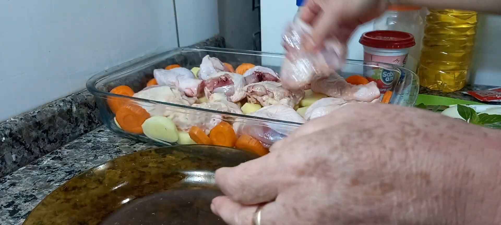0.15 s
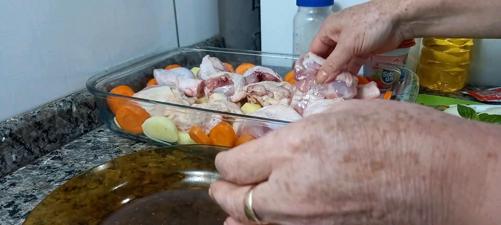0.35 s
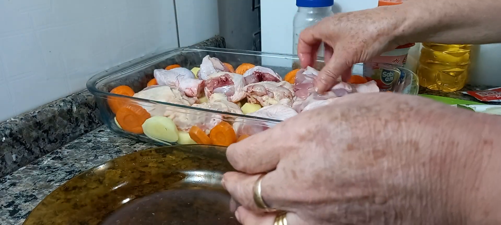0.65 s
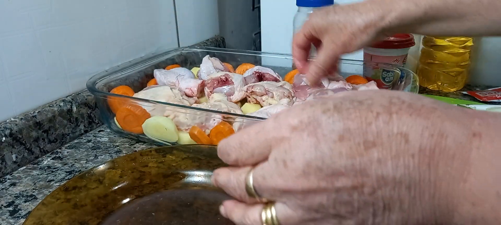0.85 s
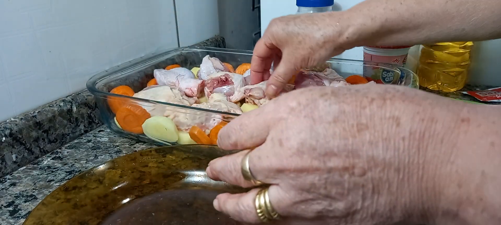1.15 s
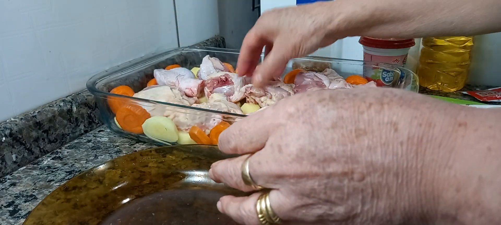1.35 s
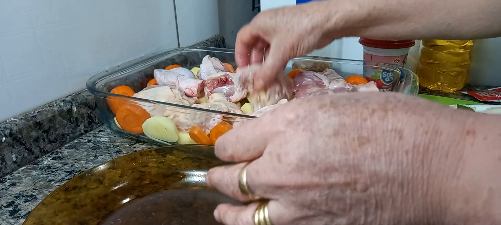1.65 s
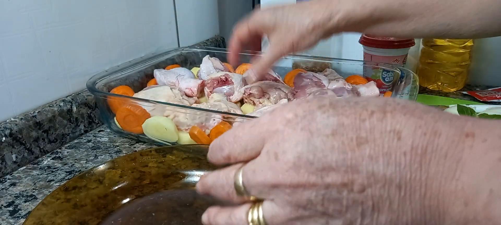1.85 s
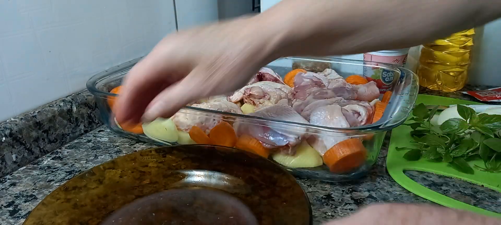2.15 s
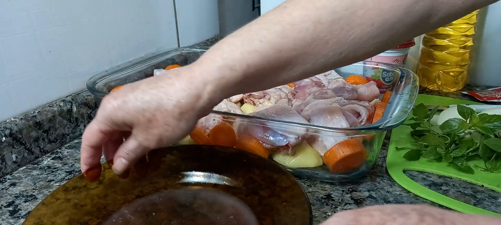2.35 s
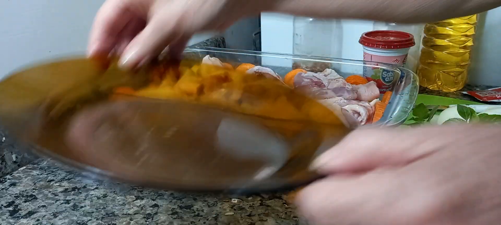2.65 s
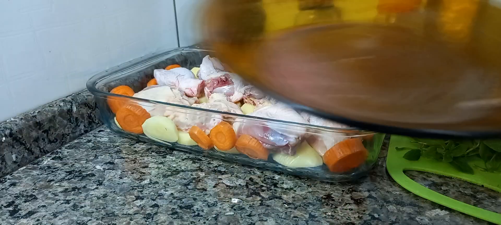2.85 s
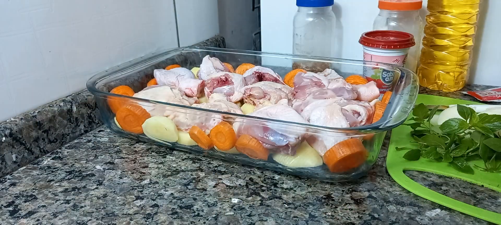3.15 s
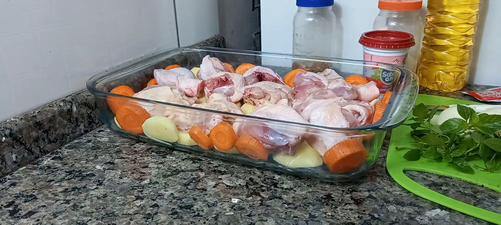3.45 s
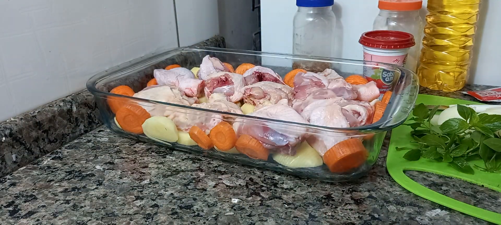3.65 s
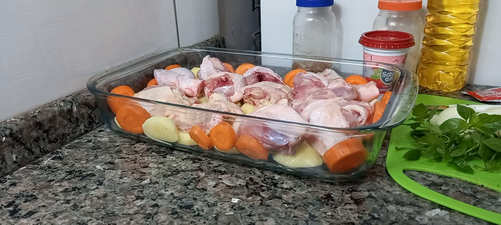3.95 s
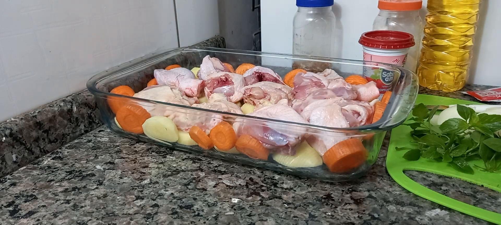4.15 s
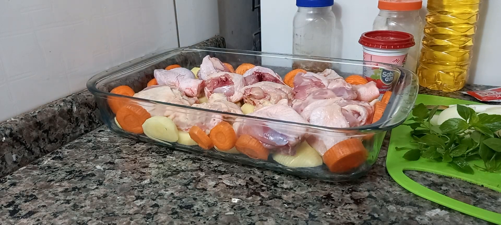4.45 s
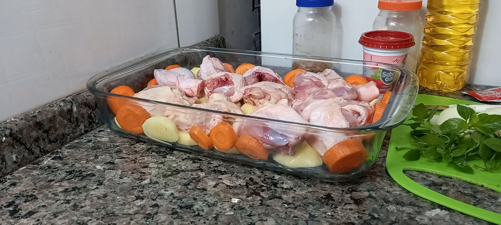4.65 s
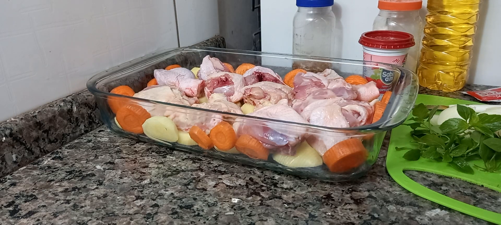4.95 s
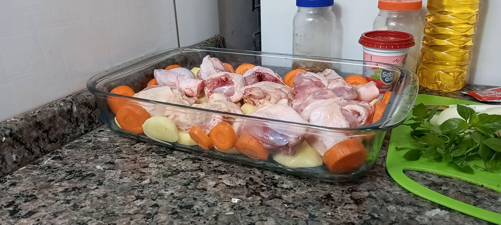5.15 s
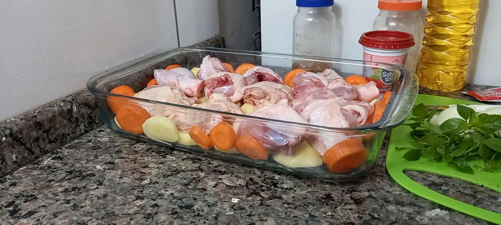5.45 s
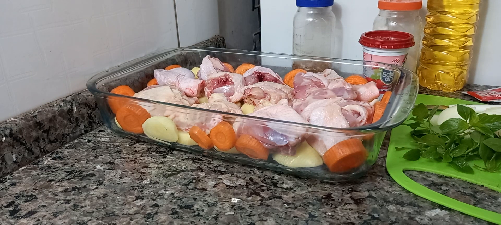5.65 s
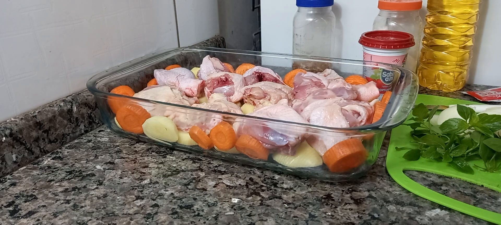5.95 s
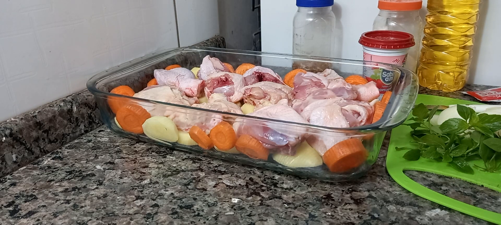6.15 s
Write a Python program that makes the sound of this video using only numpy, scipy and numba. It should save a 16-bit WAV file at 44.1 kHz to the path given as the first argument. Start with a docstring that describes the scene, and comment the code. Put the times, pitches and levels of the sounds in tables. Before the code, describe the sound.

A fridge hums low and steady throughout, in a tiled kitchen with a short echo. For the first two seconds, close to the microphone, raw chicken is tucked into a glass baking dish with faint wet smacks; the dish gives one clear, dull knock at about 0.8 seconds and a few much softer ones. Around 2.2 seconds a glass plate scrapes lightly as it is lifted, and a finger ring ticks against it. Soft steps scuff from about 2.6 to 4.2 seconds. At 4.5 seconds the plate clatters on a stone counter, bright and sharp, the loudest moment. At 5.1 it clips the sink's edge in three quick clacks and lands in the steel basin with a ring and a short low boom. From about 5.6 seconds a tap spits and runs, hissing, bubbling and gurgling, then drumming lightly on the basin until the end, near 6.4 seconds.

```python
"""A tiled kitchen. A fridge hums throughout; a phone with two microphone ports stands by a glass dish.
Raw chicken is tucked into the dish with small wet smacks and dull knocks. The empty glass plate
scrapes as it is lifted and is carried off with scuffing steps. It clatters on the stone counter,
clips the sink's edge and lands in the steel basin, each blow ringing modes over a short clack.
Then a tap runs: spray, bubbles, a gurgling hollow and drumming on the basin."""
import sys
import numpy as np
from scipy import signal
from scipy.fft import rfft, irfft, next_fast_len
from scipy.io import wavfile
from numba import njit

SR = 44100
rng = np.random.default_rng(int(sys.argv[2]) if len(sys.argv) > 2 else 0)


def unload_wav(signal):
    """Save mono or channel-first audio to the path in sys.argv[1] as 16-bit WAV at rate SR, clipped to [-1, 1]."""
    wavfile.write(
        sys.argv[1],
        SR,
        np.round(np.clip(np.atleast_2d(signal).T, -1, 1) * 32767).astype(np.int16),
    )


N = 278261
TIME = np.arange(N) / SR
AGE = TIME[:SR // 2]  # time since an event's onset, s


def undb(db):
    """Decibels to gain."""
    return 10 ** (np.asarray(db) / 20)


def unit(x):
    """Scale to rms 1."""
    return x / np.sqrt(np.mean(x ** 2) + 1e-30)


def along(points, hz):
    """Interpolate (f/Hz, value) points on a log-frequency axis."""
    f, value = np.transpose(points)
    return np.interp(np.log(hz + 1), np.log(f), value)


def shape(x, gain):
    """Filter by gain(f/Hz)."""
    size = next_fast_len(x.shape[-1])
    return irfft(rfft(x, size) * gain(np.fft.rfftfreq(size, 1 / SR)), size)[..., :x.shape[-1]]


def colour(x, points):
    """Filter by (f/Hz, level/dB) points; rms 1."""
    return unit(shape(x, lambda f: undb(along(points, f))))


def band(x, hz, width_hz):
    """Steep-skirted resonance; rms 1."""
    return unit(shape(x, lambda f: 1 / (1 + ((f * f - hz * hz) / ((f + 1) * width_hz)) ** 2)))


@njit
def moving_band(x, hz, width_hz):
    """State-variable band-pass with a moving centre."""
    y, band_state, low_state = np.empty(len(x)), 0., 0.
    for i in range(len(x)):
        g, damping = np.tan(np.pi * hz[i] / SR), width_hz / hz[i]
        passed = (band_state + g * (x[i] - low_state)) / (1 + g * (g + damping))
        band_state = 2 * passed - band_state
        low_state += 2 * g * passed
        y[i] = damping * passed
    return y


def noise(size):
    """Independent white noise at each port."""
    return rng.standard_normal((2, size))


def grains(per_s, spread_db):
    """Dense clicks of uneven size at each port; rms 1."""
    sizes = undb(spread_db * np.minimum(rng.exponential(size=(2, N)), 5))
    return unit((rng.random((2, N)) < per_s / SR) * sizes * rng.choice([-1, 1], (2, N)))


def walk(rate_hz):
    """Slow random drift; rms near 1."""
    knots = np.linspace(0, TIME[-1], 2048)
    lowpass = np.exp(-(np.fft.rfftfreq(len(knots), knots[1]) / rate_hz) ** 2)
    return np.interp(TIME, knots, unit(irfft(rfft(rng.standard_normal(len(knots))) * lowpass)))


def surge(peak_s, attack_s, release_s):
    """Exponential rise to 1 at peak_s, then decay."""
    return np.exp(-np.maximum((peak_s - TIME) / attack_s, (TIME - peak_s) / release_s))


def turn(mid_s, ease_s):
    """Smooth step from 0 to 1, half done at mid_s."""
    return .5 + .5 * np.tanh((TIME - mid_s) / (2 * ease_s))


def add(out, at_s, sound):
    """Mix a sound in at at_s."""
    start = int(at_s * SR)
    out[:, start:start + sound.shape[1]] += sound[:, :N - start]


def chatter(length_s, count=9):
    """Contact energies of one touch: a firm first contact, then a quick uneven run."""
    contacts = np.zeros(len(AGE))
    later = np.arange(count) > 0
    position = (np.arange(count) + rng.uniform(0, 1, count) * later) / count
    energy = undb(np.where(later, 4 * rng.standard_normal(count), 6))
    np.add.at(contacts, (position * length_s * SR).astype(int), energy)
    return contacts / contacts.sum()


def swell(contacts, t60_s):
    """Envelope of a resonance that gains energy at each contact and decays."""
    retained = np.exp(-np.log(1e6) / (t60_s * SR))
    return np.sqrt(signal.lfilter([1], [1, -retained], contacts))


def ports(x, spacing_m):
    """Long waves reach both ports alike, short ones unrelated."""
    likeness = lambda f: .97 * np.sinc(2 * f * spacing_m / 343)
    mid = shape(x[0] + x[1], lambda f: np.sqrt(1 + likeness(f))) / 2
    side = shape(x[0] - x[1], lambda f: np.sqrt(1 - likeness(f))) / 2
    return np.array([mid + side, mid - side])


def lean(x, points):
    """Pan by (f/Hz, L-R/dB) points."""
    return shape(x, lambda f: undb(np.array([[.5], [-.5]]) * along(points, f)))


# room decay: f/Hz, t60/s
ROOM_T60 = [(100, 0.35), (500, 0.45), (2000, 0.39), (5000, 0.44), (9000, 0.35), (15000, 0.41)]


def kitchen(x, delay_s, build_s):
    """Tiles and stone return a dense, fast-building echo."""
    tail, source = 0, noise(len(AGE))
    for hz, t60_s in ROOM_T60:
        share = [(f, float(f == hz)) for f, _ in ROOM_T60]
        tail += shape(source, lambda f: along(share, f)) * np.exp(-np.log(1000) * AGE / t60_s)
    tail *= 1 - np.exp(-np.maximum(AGE - delay_s, 0) / build_s)
    return signal.fftconvolve(x, unit(tail) / np.sqrt(len(AGE)), axes=1)[:, :N]


# motor lines and electrical whines: f/Hz, level/dB
HUM_LINES = [(59.3, -66), (118.4, -60.5), (188.4, -55), (236.9, -51), (5523, -92), (6831, -93), (8694, -86),
             (13103, -81.5)]
# fan rumble and faint hiss: f/Hz, level/dB
FAN_SPECTRUM = [(25, -32), (40, -28.5), (60, -11), (120, -5.5), (160, -11.5), (250, -1.5), (340, -10),
                (500, -18.5), (750, -33), (1300, -40.5), (2500, -47), (4400, -48), (5600, -48.5),
                (14000, -48.5)]
# fridge off to the right: f/Hz, L-R/dB
FRIDGE_LEAN = [(220, -0.5), (450, -5), (1100, -1.5), (2500, 1), (6000, 1.5)]


def fridge(fan_db, waver_db, cabinet_db, cabinet_hz):
    """Motor lines waver over the fan's rumble and a throbbing cabinet resonance."""
    hum = 0
    for hz, db in HUM_LINES:
        gain = undb(db + waver_db * walk(9.1))
        hum += gain * unit(np.sin(2 * np.pi * hz * TIME + 0.3 * walk(1.1)))
    cabinet = undb(cabinet_db + 4.4 * walk(3.7)) * band(noise(N), cabinet_hz, width_hz=41.4)
    fan = undb(fan_db) * colour(noise(N), FAN_SPECTRUM)
    return hum + lean(ports(fan + cabinet, spacing_m=0.19), FRIDGE_LEAN)


# steps to the sink: peak t/s, relative level/dB, attack/s
SCUFFS = [(2.646, -51.5, 0.035), (2.905, -59, 0.017), (3.039, -56, 0.015), (3.11, -54, .014),
          (3.89, -50, 0.016), (3.995, -60.5, 0.022), (4.256, -69, 0.09)]
# rubbing cloth: f/Hz, level/dB
CLOTH_SPECTRUM = [(200, -5.5), (500, -1.5), (900, 2), (1500, -2), (2500, -5), (4000, -6), (6500, -14),
                  (10000, -6.5), (15000, -11)]


def slippers(gain_db, release_s):
    """Slippers scuff the floor: countless fibres slip at each step."""
    effort = sum(undb(db) * surge(peak_s, attack_s, release_s) for peak_s, db, attack_s in SCUFFS)
    return undb(gain_db) * effort * colour(grains(per_s=6100, spread_db=3.8), CLOTH_SPECTRUM)


# wet skin, later the first drops: t/s, level/dB, f/Hz, length/s
SMACKS = [(0.053, -62.5, 2200, 0.016), (0.402, -62, 9100, 0.011), (1.098, -52.5, 2080, 0.012),
          (1.109, -58.5, 7770, 0.0082), (1.223, -68, 8100, 0.0074), (1.343, -65, 3880, .012),
          (1.435, -53, 12100, 0.067), (2.145, -60.5, 13100, 0.0062), (2.181, -55, 5560, 0.024),
          (2.225, -60, 5840, 0.019), (5.427, -57, 8900, .006), (5.53, -56, 5840, 0.026),
          (5.586, -54, 6340, 0.0071)]


def smacks(t60_s, width_share):
    """Sticky skin and drops let go in runs of tiny snaps."""
    out = np.zeros((2, N))
    for at_s, db, hz, length_s in SMACKS:
        snap = band(noise(len(AGE)), hz, hz * width_share)
        add(out, at_s, undb(db) * snap * swell(chatter(length_s, count=12), t60_s))
    return out


# plate picked up: t/s, level/dB, length/s
SCRAPES = [(2.174, -52.5, 0.029), (2.196, -46.5, 0.047), (2.322, -46.5, 0.02), (2.893, -52.5, 0.075)]
# grit: f/Hz, level/dB
GRIT_SPECTRUM = [(700, 0), (2000, 2), (3400, -23), (4600, -8), (6500, -16), (9000, -30)]


def scrapes(hz, width_share, grit_db, t60_s):
    """The plate's foot grates: a run of slips rings one broad resonance, plus grit."""
    out = np.zeros((2, N))
    for at_s, db, length_s in SCRAPES:
        grating = band(noise(len(AGE)), hz, hz * width_share)
        grating += undb(grit_db) * colour(noise(len(AGE)), GRIT_SPECTRUM)
        add(out, at_s, undb(db) * grating * swell(chatter(length_s, count=24), t60_s))
    return out


def bubbles(start_s, low_hz, high_hz, decay_cycles, count=600):
    """Air trapped by the jet rings in short rising blips."""
    out, age = np.zeros((2, N)), AGE[:1000]
    for when, pitch, size, side in rng.random((count, 4)):
        hz = low_hz * (high_hz / low_hz) ** pitch
        decay = age * hz / decay_cycles
        blip = np.exp(-decay) * np.sin(2 * np.pi * hz * age * (1 + 0.04 * np.minimum(decay, 4)))
        pan = np.sqrt([[side], [1 - side]])
        add(out, start_s + when * (TIME[-1] - start_s), size ** 3 * pan * blip)
    return out / out[:, int(start_s * SR):].std()


def hollow(dug_s, shallow_hz, deep_hz, width_hz):
    """Drops ring the hollow the jet digs in the water; its pitch sinks as it deepens."""
    hz = shallow_hz + (deep_hz - shallow_hz) * turn(dug_s, ease_s=0.0074)
    hz *= 1 + 0.035 * walk(28)
    drops = grains(per_s=2700, spread_db=2.1)
    return unit(np.array([moving_band(moving_band(port, hz, width_hz), hz, width_hz) for port in drops]))


# jet spits: peak t/s, level/dB
SPURTS = [(5.635, -49.5), (5.735, -51.5), (6.015, -59), (6.205, -53.5), (6.25, -45)]
# hollow gurgles: peak t/s, level/dB
GURGLES = [(5.826, -46), (5.937, -50), (6.13, -59), (6.265, -56)]
# bright hiss of spray: f/Hz, level/dB
HISS_SPECTRUM = [(2500, -6.5), (4500, 6), (6500, -4), (9000, 7.5), (12000, 8.5), (16000, 2)]
# water on steel: f/Hz, level/dB
DRUM_SPECTRUM = [(200, -29), (500, 0), (900, -14), (1500, 1), (2500, -10), (5000, -29)]


def tap(open_s, ease_s, on_basin_s, spray_db, bubble_db, splash_db, drum_db, basin_db, flutter_db):
    """The jet sprays, traps bubbles, rings its hollow and drums on the basin; all grow with the flow."""
    def surges(rows):
        return sum(undb(db) * surge(peak_s, attack_s=0.019, release_s=0.018) for peak_s, db in rows)

    flow = turn(open_s, ease_s)
    spray_gain = undb(spray_db) * flow + surges(SPURTS)
    splash_gain = undb(splash_db) * flow ** 2 + surges(GURGLES)
    drum_gain = flow * (undb(drum_db) + undb(basin_db) * turn(on_basin_s, ease_s=0.037))
    splash = hollow(dug_s=5.75, shallow_hz=4250, deep_hz=2390, width_hz=610.0)
    spray = colour(grains(per_s=9000, spread_db=2.1), HISS_SPECTRUM)
    blips = bubbles(open_s - 2 * ease_s, low_hz=2560, high_hz=6530, decay_cycles=7.1)
    water = spray_gain * (spray + undb(bubble_db) * blips)
    water += splash_gain * undb(2 * walk(23)) * splash
    water += drum_gain * colour(grains(per_s=2900, spread_db=1.5), DRUM_SPECTRUM)
    return water * undb(flutter_db * walk(41))


def strike(hits, modes, clack, ring_t60_s, clack_t60_s, ring_db):
    """Blows ring an object's modes over a clack of dense, brief resonances. Returns (direct, to room)."""
    direct, to_room = np.zeros((2, 2, N))
    for at_s, db, chatter_s, cutoff_hz, pan_db, room_db in hits:
        contacts = chatter(chatter_s)
        ring = 0
        for hz, mode_db in modes:
            detuned_hz = hz * (1 + 0.00021 * rng.standard_normal())  # by the contact
            port_phase = rng.random((2, 1))
            ring += undb(mode_db) * np.sin(2 * np.pi * (detuned_hz * AGE + port_phase))
        blow = undb(ring_db) * unit(ring) * swell(contacts, ring_t60_s)
        blow += colour(noise(len(AGE)), clack) * swell(contacts, clack_t60_s)
        # softer contact, less treble
        blow = signal.sosfilt(signal.butter(2, [60, cutoff_hz], "band", fs=SR, output="sos"), blow)
        blow *= undb(db) / np.sqrt(np.sum(blow ** 2) / (.04 * SR))  # level: energy spread over 40 ms
        add(direct, at_s, blow * undb(np.array([[pan_db], [-pan_db]]) / 2))
        add(to_room, at_s, blow * undb(room_db))
    return np.array([direct, to_room])


# finger ring on plate: t/s, level/dB, chatter/s, cut-off/Hz, L-R/dB, room send/dB
CLINK_HITS = [(2.3985, -52, .002, 9700, 4.1, -3.5)]
# modes: f/Hz, level/dB
CLINK_MODES = [(1519, -4), (2642, 0.5), (3617, -6), (4326, -5.5), (4714, -4), (5955, -12), (6273, -7.5)]


def ring_clink():
    """A finger ring taps the plate: a faint ping with a bright tick."""
    return strike(CLINK_HITS, CLINK_MODES, HISS_SPECTRUM, ring_t60_s=0.044, clack_t60_s=0.014, ring_db=-8)


# knocks on the dish: t/s, level/dB, chatter/s, cut-off/Hz, L-R/dB, room send/dB
DISH_HITS = [(.619, -53.5, 0.004, 1300, -2, 0), (.8455, -29.5, 0.0048, 5440, 1, -2),
             (.8505, -30, 0.002, 4500, 1, -2), (1.487, -66, 0.0021, 4000, 0.16, -3),
             (1.797, -64, 0.0031, 1200, 0, 0)]
# modes and clack spectrum: f/Hz, level/dB
DISH_MODES = [(723, -10.5), (807, -3.5), (1413, -4.5), (1720, -14), (1980, -9.5), (2493, -16), (3176, -31)]
DISH_CLACK = [(200, -12.5), (400, -4.5), (600, -18), (800, 3.5), (1050, -4.5), (1400, 1.5), (2100, -11),
              (3200, -21.5), (4200, -34), (6000, -43), (9000, -66.5)]


def dish_knocks():
    """The glass baking dish knocks dully as the chicken goes in."""
    return strike(DISH_HITS, DISH_MODES, DISH_CLACK, ring_t60_s=0.061, clack_t60_s=0.033, ring_db=-9)


# basin booms: t/s, level/dB, f/Hz, swell/s
BOOMS = [(5.198, -33, 102.5, 0.015), (5.388, -52, 241, 0.011)]


def basin_booms(t60_s):
    """The basin's thin floor flexes under the plate."""
    out = np.zeros((2, N))
    for at_s, db, hz, swell_s in BOOMS:
        boom = band(noise(len(AGE)), hz, width_hz=hz / 2)
        add(out, at_s, undb(db) * boom * swell(chatter(swell_s), t60_s))
    return out


# plate into sink: t/s, level/dB, chatter/s, cut-off/Hz, L-R/dB, room send/dB
SINK_HITS = [(5.1915, -21.5, 0.0054, 12000, 0, 0), (5.198, -26, 0.0077, 5800, 0, 0)]
# modes and clack spectrum: f/Hz, level/dB
SINK_MODES = [(98, -13), (234, 10), (402, 13.5), (966, -23), (1402, 11.5), (1444, 6), (1943, -17),
              (2231, 14.5), (2634, -9), (2715, 8.5), (3513, 10.5), (4401, 4), (5865, -27), (6307, -30)]
SINK_CLACK = [(30, -45), (60, -17), (100, -22), (200, -0.5), (450, -6.5), (700, -1), (1400, -2),
              (2600, -0.5), (4000, -15.5), (6500, -23.5), (10000, -14), (15000, -28)]


def plate_in_sink():
    """The plate lands in the steel sink with a lower, longer ring."""
    return strike(SINK_HITS, SINK_MODES, SINK_CLACK, ring_t60_s=0.14, clack_t60_s=0.053, ring_db=-7)


# plate on sink edge: t/s, level/dB, chatter/s, cut-off/Hz, L-R/dB, room send/dB
EDGE_HITS = [(5.086, -19.5, 0.014, 7000, 0, -3.5), (5.136, -31.5, 0.0058, 1500, 0, 0),
             (5.173, -27, 0.003, 6300, 0, 1)]
# modes and clack spectrum: f/Hz, level/dB
EDGE_MODES = [(402, -3), (836, 1.5), (922, 8.5), (1461, 1.5), (1918, 3.5), (2067, 2.5), (2738, -1),
              (3493, -1), (4358, -6.5), (5982, -16), (6293, -11.5), (6516, -27), (7399, -16), (9974, -21),
              (10831, -10), (12000, -21), (12750, -23), (14950, -19)]
EDGE_CLACK = [(150, -37), (400, -2), (900, -8), (1800, 1.5), (2800, -6.5), (4000, -15.5), (6300, -19.5),
              (9000, -7), (15000, -9.5)]


def plate_on_edge():
    """The plate clips the sink's edge in three short clacks."""
    return strike(EDGE_HITS, EDGE_MODES, EDGE_CLACK, ring_t60_s=0.036, clack_t60_s=0.028, ring_db=-2)


# plate on counter: t/s, level/dB, chatter/s, cut-off/Hz, L-R/dB, room send/dB
PLATE_HITS = [(4.4685, -18, 0.0053, 16000, 2, 1), (4.4785, -15, 0.0053, 10300, 2, -4),
              (4.582, -29, 0.0056, 3020, 2, 1), (4.897, -54.5, 0.0021, 5900, 0, 0.5),
              (5.003, -58, 0.027, 5960, 0, 3.5)]
# modes and clack spectrum: f/Hz, level/dB
PLATE_MODES = [(512, -5), (926, 1), (1024, -14), (1445, -6), (1957, 3.5), (2151, -12.5), (2466, -13),
               (2616, -1), (3289, -4.5), (3386, 0.5), (3507, 2.5), (4061, -10.5), (4531, -1.5), (5685, -6),
               (5811, -6), (5921, -11), (6294, -12.5), (6941, -10), (7344, -14.5), (7794, -9), (8379, -7),
               (8991, -4.5), (9399, -7.5), (9878, -1.5), (10853, -5.5), (11540, -6.5), (12171, -3.5),
               (12775, -13.5), (13312, -16.5), (14643, -15.5), (15150, -13.5)]
PLATE_CLACK = [(120, -33), (300, 0.5), (500, -8), (1000, 0), (2000, -4), (3000, -8), (4500, -6),
               (6000, -18.5), (8000, -20.5), (12000, -24.5), (15000, -21.5)]


def plate_on_counter():
    """Glass meets stone: hard contacts ring the plate far into the treble."""
    return strike(PLATE_HITS, PLATE_MODES, PLATE_CLACK, ring_t60_s=0.054, clack_t60_s=0.048, ring_db=1.5)


def scene():
    """Near and far sources, their echo and the fridge at the two ports."""
    direct, to_room = plate_on_counter() + plate_on_edge() + plate_in_sink() + dish_knocks() + ring_clink()
    near = smacks(t60_s=0.038, width_share=0.61) + basin_booms(t60_s=0.37)
    near += scrapes(hz=1310, width_share=0.53, grit_db=-7, t60_s=0.097)
    far = slippers(gain_db=2, release_s=0.046)
    far += tap(open_s=5.73, ease_s=0.043, on_basin_s=6.095, spray_db=-46, bubble_db=-12,
               splash_db=-60.5, drum_db=-78, basin_db=-56.5, flutter_db=2)
    echo = kitchen(to_room + undb(-4) * near + undb(-2.5) * far, delay_s=0.0013, build_s=0.0016)
    background = fridge(fan_db=-48.5, waver_db=2.5, cabinet_db=-52.5, cabinet_hz=248.1)
    # sound from straight ahead has less path between the ports
    return background + ports(far + echo, spacing_m=0.17) + ports(direct + near, spacing_m=0.11)


# microphone response: f/Hz, gain/dB
MIC_RESPONSE = [(20, -2), (4600, 0), (6600, 12), (7000, 6.5), (7400, -4.5), (9500, -9.5), (12500, -6),
                (16000, -5.5)]
# microphone balance: f/Hz, L-R/dB
MIC_LEAN = [(300, 1), (1000, -2), (2200, 1), (5000, 1.5), (9000, -1)]
TOP_HZ = 15800


def record(dry):
    """The phone's ports ring near 6.6 kHz and differ slightly; the top is cut."""
    heard = lean(shape(dry, lambda f: undb(along(MIC_RESPONSE, f))), MIC_LEAN)
    return signal.sosfilt(signal.ellip(10, .2, 80, TOP_HZ, fs=SR, output="sos"), heard)


dry = scene()
out = record(dry)
unload_wav(out)
```